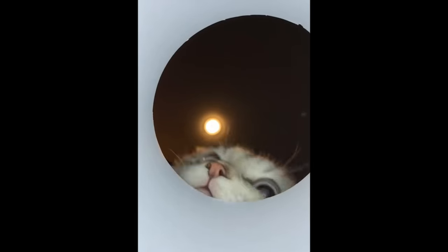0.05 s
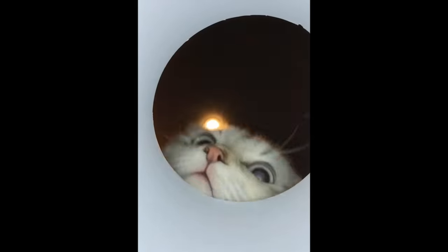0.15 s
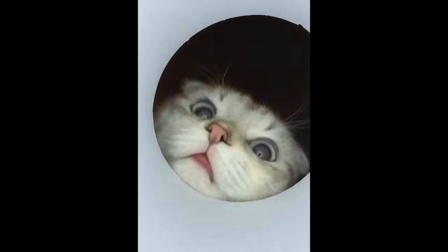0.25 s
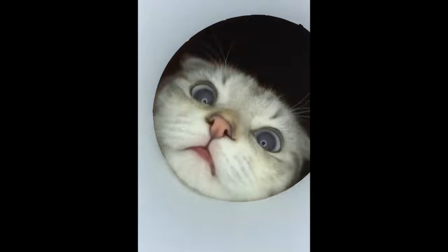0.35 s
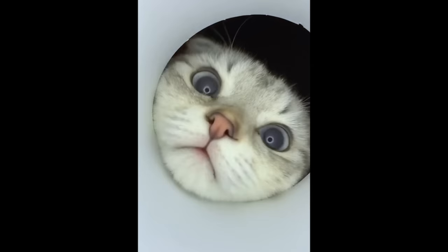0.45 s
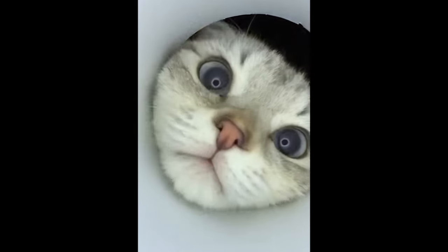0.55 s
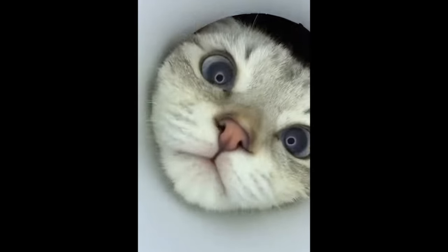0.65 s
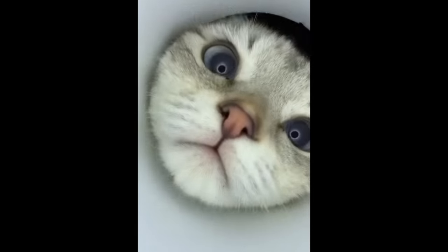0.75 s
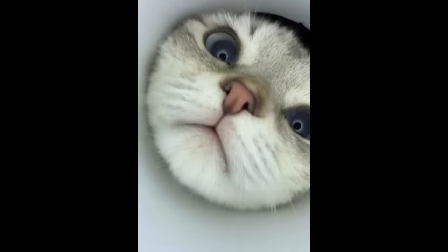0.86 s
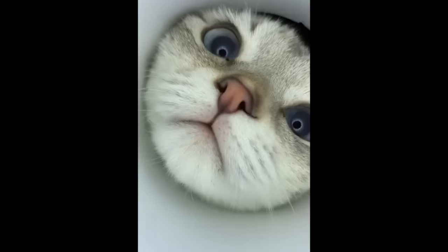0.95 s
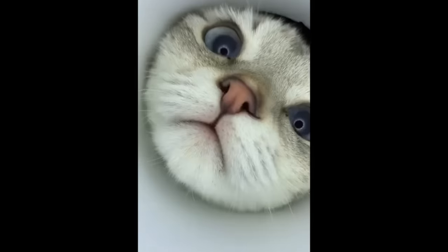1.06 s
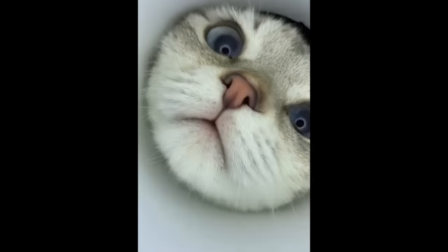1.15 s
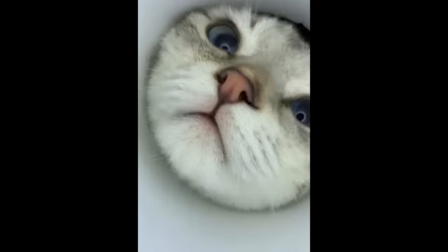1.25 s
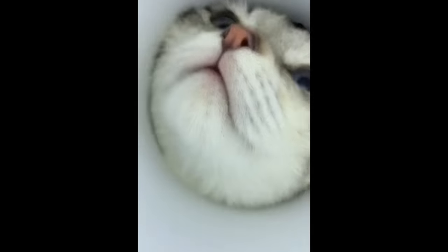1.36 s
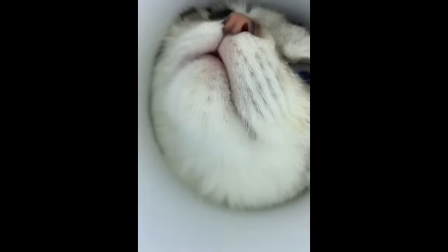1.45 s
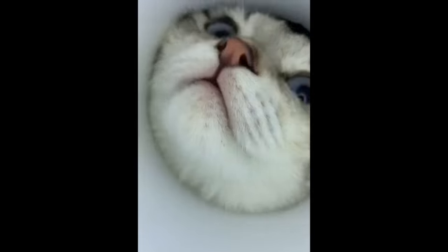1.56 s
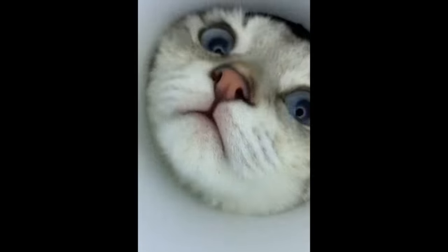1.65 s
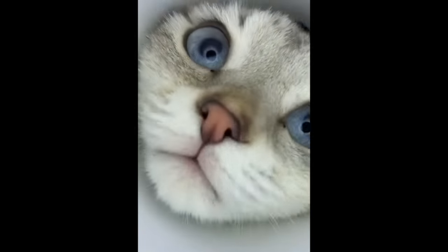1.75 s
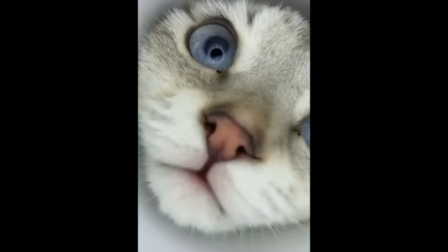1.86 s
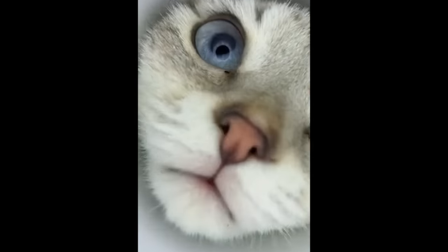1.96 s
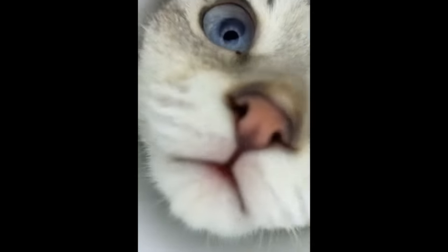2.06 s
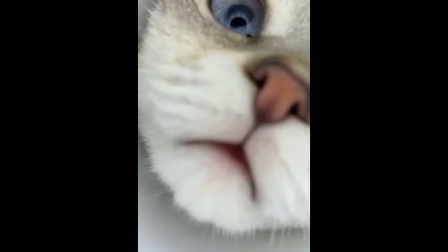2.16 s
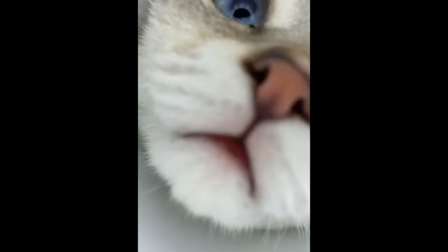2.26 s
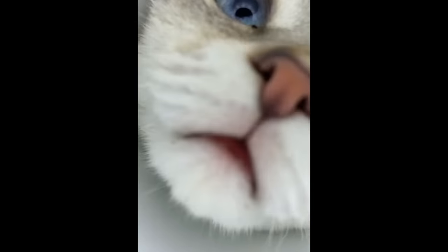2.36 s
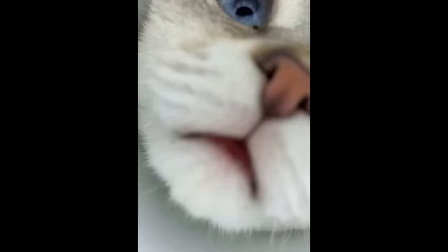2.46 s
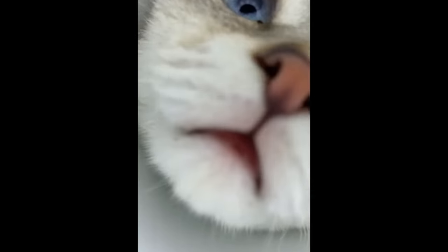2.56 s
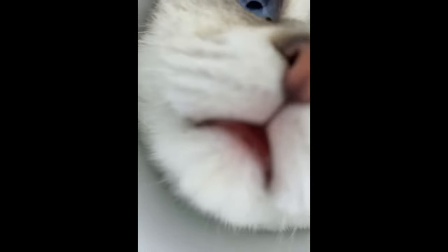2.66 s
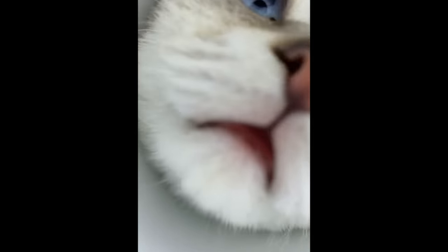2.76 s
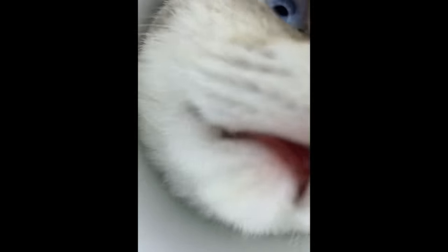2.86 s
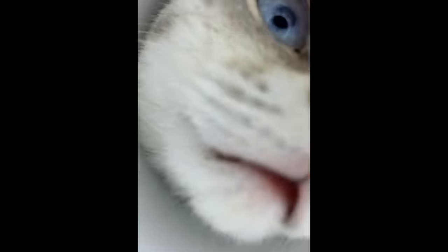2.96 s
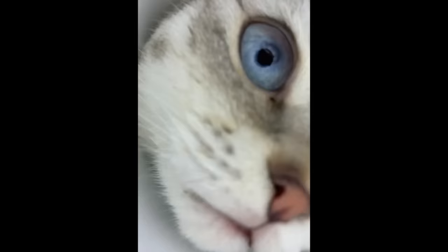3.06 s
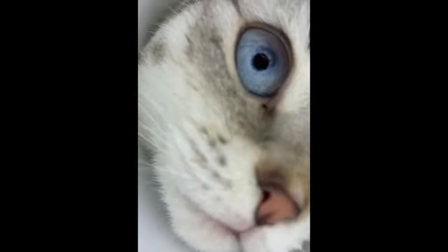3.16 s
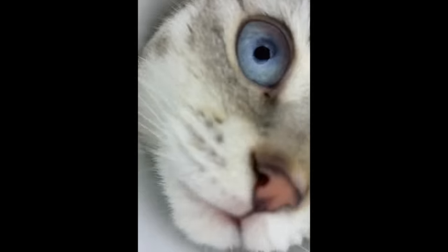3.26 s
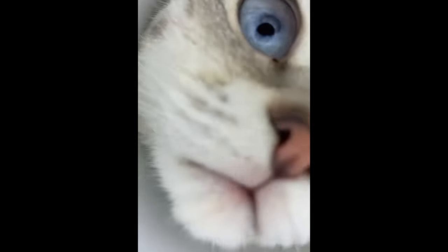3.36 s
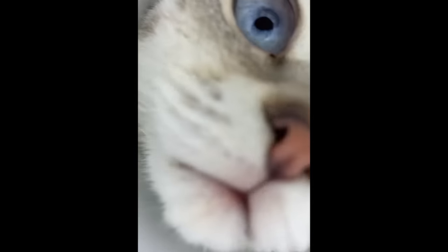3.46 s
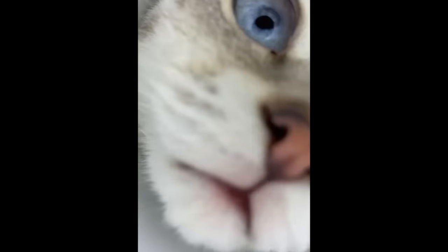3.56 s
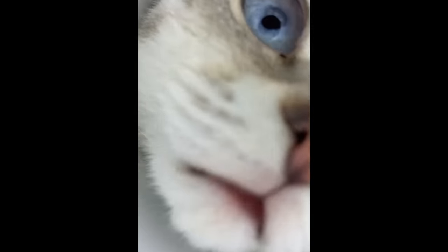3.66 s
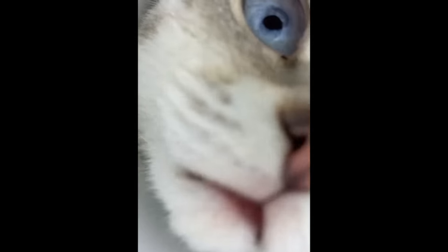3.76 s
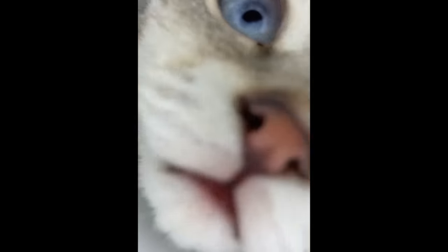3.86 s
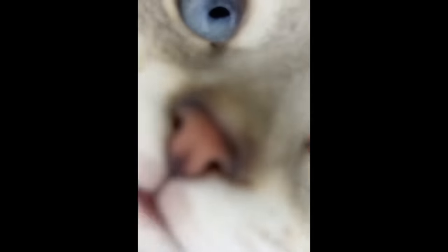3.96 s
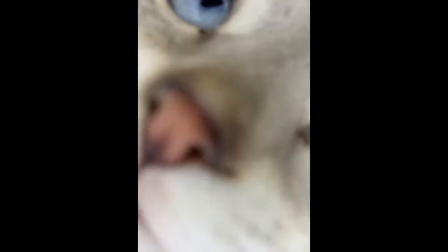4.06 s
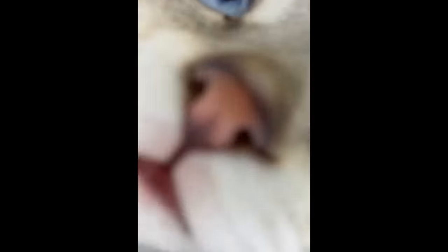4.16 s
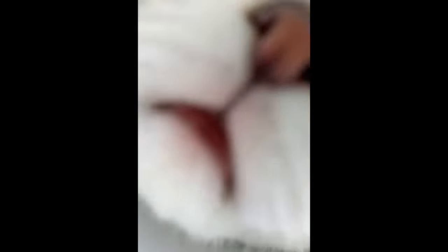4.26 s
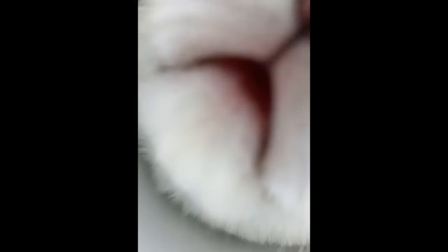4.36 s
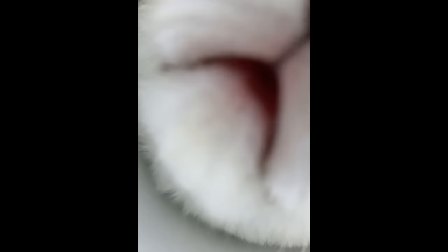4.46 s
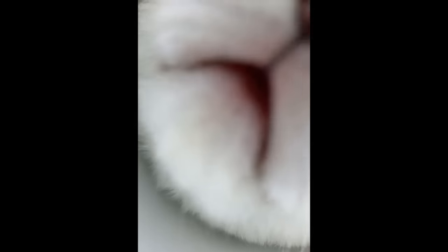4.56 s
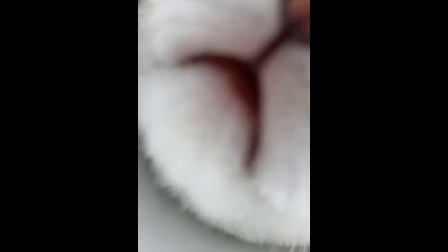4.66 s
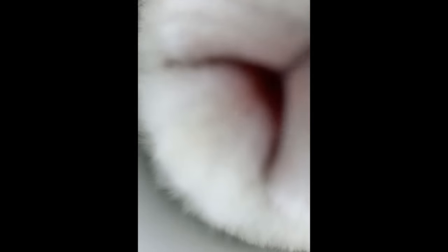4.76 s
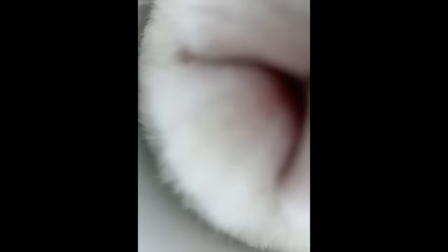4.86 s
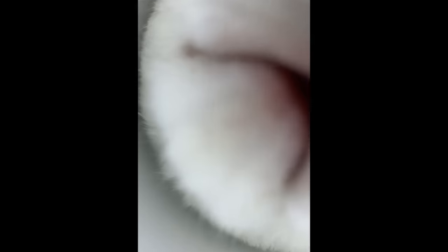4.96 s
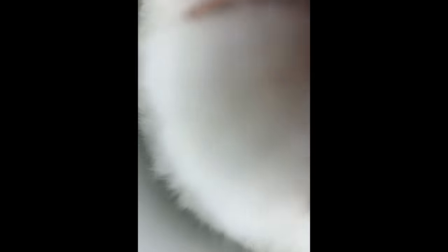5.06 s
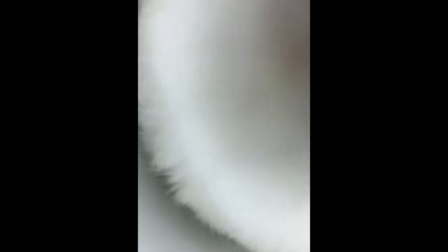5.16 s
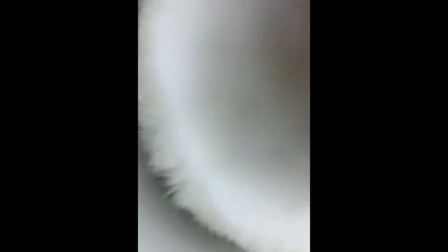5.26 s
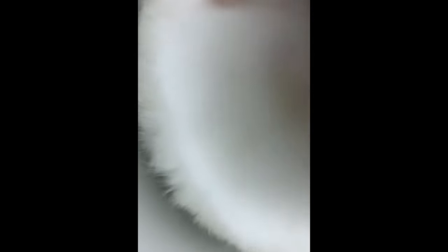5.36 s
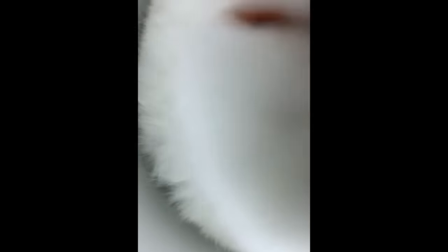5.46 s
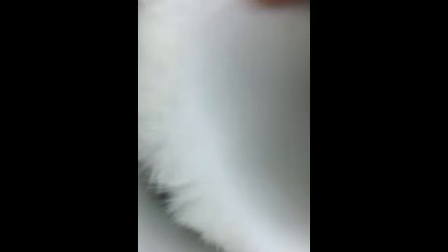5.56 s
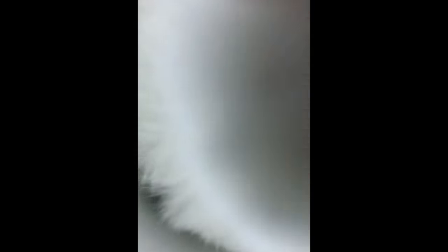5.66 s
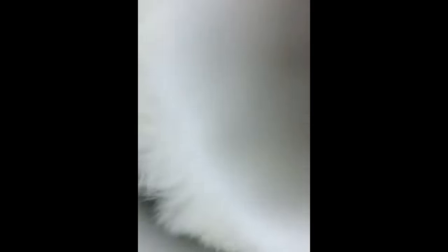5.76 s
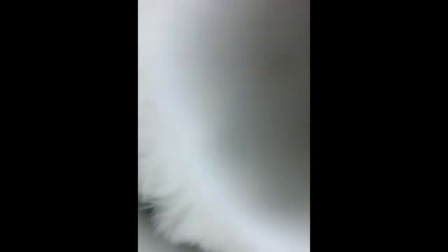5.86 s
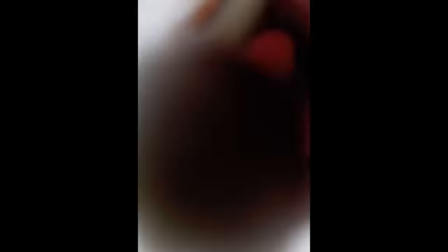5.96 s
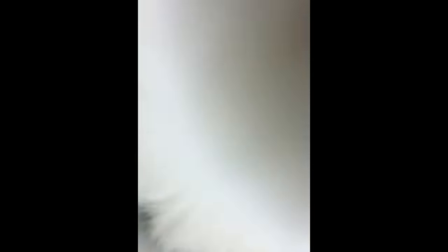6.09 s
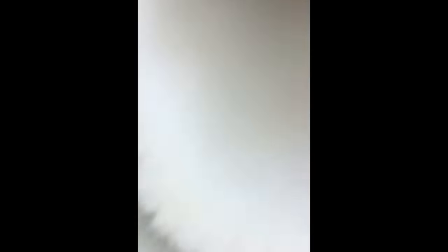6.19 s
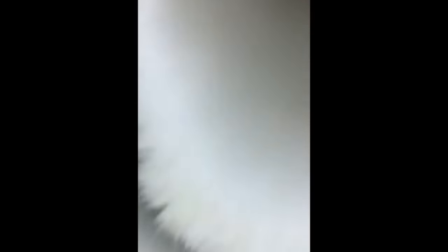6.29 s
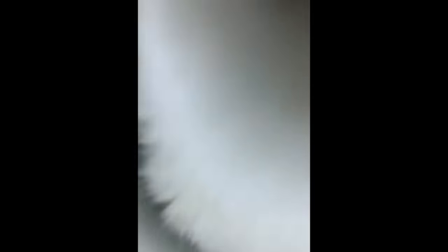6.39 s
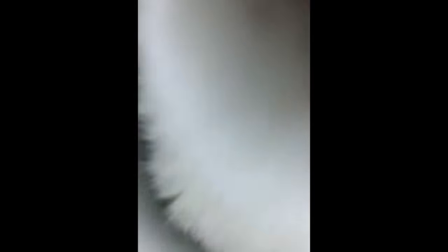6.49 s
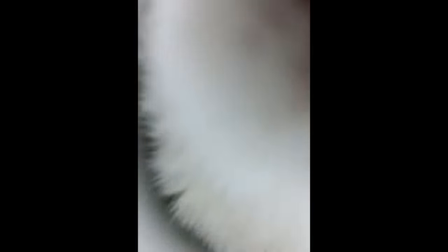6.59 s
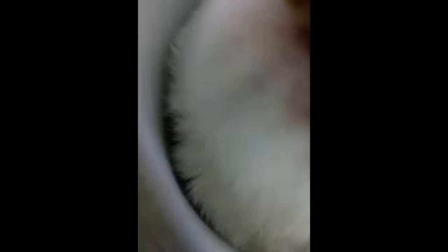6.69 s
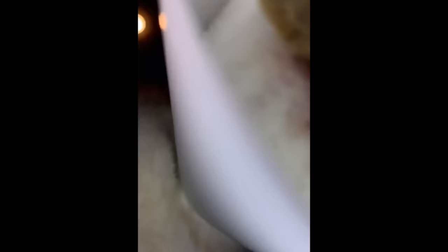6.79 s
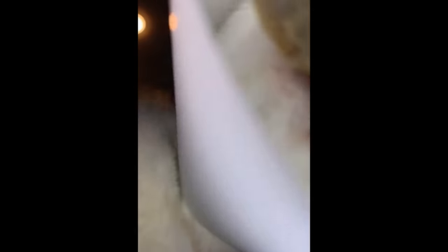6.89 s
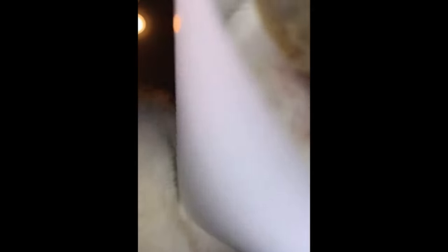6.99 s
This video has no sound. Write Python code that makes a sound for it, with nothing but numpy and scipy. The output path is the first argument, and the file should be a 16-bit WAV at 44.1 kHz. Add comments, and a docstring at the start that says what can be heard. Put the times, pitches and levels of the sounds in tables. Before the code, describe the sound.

A cat nuzzles a phone, its soft close rustling and muffled bumps building into loud scraping and knocking on the microphone.

```python
"""A cat nuzzles a phone

Fur brushes over the case in countless tiny slips, and the muzzle nudges it with soft thumps.
From five seconds on the chin grinds across the microphone ports, with scrapes and hard knocks.
Everything arrives through the case, dry and close, each click treble first and bass last."""
import sys
import numpy as np
from scipy import signal
from scipy.fft import rfft, irfft
from scipy.io import wavfile
from scipy.ndimage import uniform_filter1d

SR = 44100
rng = np.random.default_rng(int(sys.argv[2]) if len(sys.argv) > 2 else 0)


def materialize(psi):
    """Save the field psi as 16-bit PCM at rate SR to the path in sys.argv[1].

    A 1-D psi becomes a single channel; in a 2-D psi each row is a channel.
    """
    bounded = np.clip(np.atleast_2d(psi).T, -1, 1)
    quanta = np.round(bounded * 32767).astype(np.int16)
    wavfile.write(sys.argv[1], SR, quanta)


N = 310057
HZ, TIME = np.fft.rfftfreq(N, 1 / SR), np.arange(N) / SR


def amp(db):
    return 10 ** (np.asarray(db) / 20)


def unit_rms(x):
    return x / np.sqrt(np.mean(x ** 2) + 1e-20)


def eq_db(curve, hz):
    """Read an EQ curve along a log frequency axis."""
    freq_hz, gain_db = np.transpose(curve)
    return np.interp(np.log(hz + 1), np.log(freq_hz + 1), gain_db)


def place(mix, start_s, sound):
    part = mix[:, max(round(start_s * SR), 0):][:, :sound.shape[-1]]
    part += sound[..., :part.shape[1]]


def wander(rate_hz):
    """Smooth random modulation of unit size."""
    return unit_rms(irfft(rfft(rng.standard_normal(N)) * np.exp(-(HZ / rate_hz) ** 2), N))


def swell(t, length_s, attack_s, release_s, arch_db=0):
    """Envelope of one movement: it sets in, is strongest midway and lets go."""
    arch = amp(-arch_db * np.clip(2 * t / length_s - 1, -1, 1) ** 2)
    return arch * (1 + np.tanh(t / attack_s)) * (1 + np.tanh((length_s - t) / release_s)) / 4


def dispersion(hz, lag_cycles=1.5):
    """Low notes lag by a fixed number of cycles, so each click becomes a quick falling chirp."""
    return np.exp(-2j * np.pi * lag_cycles * np.log(hz + 20))


def resonance(hz, centre_hz, lift_db, q):
    """A short ring that lifts the band around one pitch."""
    return 1 + (amp(lift_db) - 1) / (1 + 1j * q * (hz / centre_hz - centre_hz / (hz + 1)))


def pitched_noise(pitch_hz, width_hz, size):
    """Noise gathered around one pitch, or a pitch curve."""
    offset_hz = np.fft.fftfreq(size, 1 / SR)
    white = rng.standard_normal(size) + 1j * rng.standard_normal(size)
    band = np.fft.ifft(np.fft.fft(white) * np.exp(-(offset_hz / width_hz) ** 2))
    carrier = np.exp(2j * np.pi * np.cumsum(pitch_hz * np.ones(size)) / SR)
    return unit_rms((band * carrier).real)


def shifting_contact(x, patchy_db, size=512):
    """The contact point shifts, so the colour keeps changing in small patches."""
    frames = dict(nperseg=size, noverlap=size * 3 // 4)
    spectra = signal.stft(x, **frames)[2]
    patches = uniform_filter1d(rng.standard_normal(spectra.shape[1:]), size=5, axis=0)
    patches = uniform_filter1d(patches, size=16, axis=1)
    return signal.istft(spectra * amp(patchy_db * unit_rms(patches)), **frames)[1][:, :N]


def friction(eq, slips_per_s, spread_db, slide, flutter_db, flutter_hz, stereo, patchy_db):
    """Tiny slips of uneven size over a smooth slide, under a fluttering grip."""
    strength = amp(spread_db * np.minimum(rng.exponential(1, (3, N)), 3))
    slips = rng.choice([-1, 1], (3, N)) * strength * (rng.random((3, N)) < slips_per_s / SR)
    drive = unit_rms(slips) + slide * rng.standard_normal((3, N))
    drive *= amp(flutter_db * np.tanh(wander(flutter_hz)))
    ports = drive[0] + stereo * drive[1:]  # each port hears a few hairs of its own
    coloured = irfft(rfft(ports) * amp(eq_db(eq, HZ)) * dispersion(HZ), N)
    return unit_rms(shifting_contact(coloured, patchy_db))


# Bass-heavy colour of the room: freq_hz, gain_db
ROOM_EQ = [(20, 4), (55, 35.5), (150, 20), (450, -8), (1000, -25), (3000, -44), (6000, -57), (13000, -36)]


def room_tone(level_db=-58.5, stereo=0.24):
    """Faint steady noise of a quiet room."""
    noise = rng.standard_normal((3, N))
    ports = noise[0] + stereo * noise[1:]
    return amp(level_db) * unit_rms(irfft(rfft(ports) * amp(eq_db(ROOM_EQ, HZ)), N))


# Glide of a faint hum on the first strokes: time_s, pitch_hz, level_db
HUM_GLIDE = [(0, 661, -74), (.1, 655, -61), (.2, 660, -56), (.3, 632, -62), (.55, 604, -73), (.7, 598, -67),
             (.9, 600, -100)]


def airy_hum(width_hz=45):
    """A narrow, airy resonance that sinks and fades as the face closes in."""
    time_s, pitch_hz, level_db = np.transpose(HUM_GLIDE)
    tone = pitched_noise(np.interp(TIME, time_s, pitch_hz), width_hz, N)
    return amp(np.interp(TIME, time_s, level_db)) * tone


# The coat rasps as the muzzle presses harder: start_s, length_s, level_db, pitch_hz, width_hz
COAT_PRESSES = [(0.16, 0.2, -60, 1620, 260), (0.75, 0.11, -56, 1560, 240), (1.27, 0.1, -60, 1520, 300),
                (3.78, 0.09, -55, 650, 220), (4.12, 0.16, -58, 1100, 700), (4.13, 0.15, -57, 2900, 700),
                (4.98, 0.11, -48, 2700, 900), (4.97, 0.13, -50, 620, 450)]
# A whisker squeaks over the case: start_s, length_s, level_db, pitch_hz
WHISKER_SQUEAKS = [(4.466, 0.012, -62, 5690), (4.488, 0.014, -63, 5680), (4.595, 0.02, -56, 9500)]


def hair_stick_slip(size=16384, lead_s=0.06, press_edge_s=0.025, squeak_edge_s=0.004, squeak_hz=190):
    """Hairs stick and slip around one pitch: broadly for the coat, squeak_hz wide for a whisker."""
    out, t = np.zeros((2, N)), np.arange(size) / SR - lead_s
    presses = [(*row, press_edge_s) for row in COAT_PRESSES]
    squeaks = [(*row, squeak_hz, squeak_edge_s) for row in WHISKER_SQUEAKS]
    for start_s, length_s, level_db, pitch_hz, width_hz, edge_s in presses + squeaks:
        envelope = amp(level_db) * swell(t, length_s, edge_s, edge_s)
        place(out, start_s - lead_s, envelope * pitched_noise(pitch_hz, width_hz, size))
    return out


# Colours of the muffled rub, coat swish, hair tips and shaking phone: freq_hz, gain_db
RUB_EQ = [(20, -21), (45, 10), (90, -2), (150, 3), (280, -3.5), (440, 1.5), (700, -12.5), (1400, -17.5),
          (2200, -22.5), (4000, -63), (13000, -27)]
SWISH_EQ = [(200, -23), (650, -3.5), (1200, -5), (2000, -6), (2900, 8), (3500, 9), (4500, -8.5),
            (5600, 4.5), (6500, -10), (8000, 3.5), (13000, -31)]
HAIR_TIP_EQ = [(2000, -99), (5000, -9.5), (6500, 11), (8500, 7), (9700, 7.5), (10700, 4), (12000, 3),
               (13000, -8)]
RUMBLE_EQ = [(15, -24.5), (30, -15), (55, 2), (100, -2), (170, -2), (300, -22), (800, -72), (3000, -82)]
# Hollows of the case that the swish rings: pitch_hz, width_hz, lift_db
CASE_HOLLOWS = [(890, 49, 4), (1552, 460, 12.5), (4477, 610, 20.5)]
# Cheek strokes, pressure being rub over brushing: start_s, length_s, brush_db, pressure_db
CHEEK_STROKES = [(0.04, 0.077, -50.5, -26), (0.145, 0.15, -43.5, -25), (0.296, 0.39, -47, -11.5),
                 (0.719, 0.13, -45.5, -4), (0.856, 0.11, -69.5, 11), (1.039, 0.036, -62.5, 9),
                 (1.249, 0.12, -46, -9), (1.404, 0.063, -69.5, -4), (1.497, 0.11, -57.5, 4),
                 (1.635, 0.37, -53.5, -2), (2.007, 0.16, -49.5, -1), (2.179, 0.22, -68.5, 8.5),
                 (2.51, 0.11, -67, 11), (2.721, 0.083, -60, 7.5), (2.809, 0.067, -61.5, 11),
                 (2.916, 0.12, -54.5, 6), (3.067, 0.095, -60, 7), (3.194, 0.21, -59.5, 1.5),
                 (3.474, 0.023, -62.5, 8.5), (3.578, 0.1, -60.5, 1.5), (3.762, 0.26, -59.5, 7),
                 (4.086, 0.19, -52.5, 6), (4.285, 0.15, -68, 15.5), (4.468, 0.025, -74, 21),
                 (4.552, 0.36, -59, 12), (4.913, 0.22, -53.5, 2)]


def cheek_strokes(flatten=0.098):
    """The cheek slides along the case: a muffled rub, a swish of coat and a fine hiss of hair tips."""
    rub_gain, swish_gain, tips_gain = amp([-66, -78, -78])  # resting contact
    for start_s, length_s, brush_db, pressure_db in CHEEK_STROKES:
        envelope = swell(TIME - start_s, length_s, attack_s=0.029, release_s=0.026, arch_db=1.5)
        gain = amp(brush_db) * envelope
        rub_gain += gain * amp(pressure_db)
        # pressure flattens the hair tips, trading hiss for swish
        swish_gain += gain * amp(flatten * pressure_db)
        tips_gain += gain * amp(-flatten * pressure_db)
    rub = friction(RUB_EQ, slips_per_s=900, spread_db=1, slide=0.53,
                   flutter_db=3.5, flutter_hz=40, stereo=0.64, patchy_db=3)
    swish = friction(SWISH_EQ, slips_per_s=4000, spread_db=1.5, slide=0.57,
                     flutter_db=0.5, flutter_hz=70, stereo=0.0053, patchy_db=3)
    tips = friction(HAIR_TIP_EQ, slips_per_s=4600, spread_db=5.5, slide=1,
                    flutter_db=2, flutter_hz=75, stereo=0.92, patchy_db=2)
    rumble = friction(RUMBLE_EQ, slips_per_s=470, spread_db=0.5, slide=1,
                      flutter_db=8.5, flutter_hz=42, stereo=0.14, patchy_db=3)
    hollows_db = sum(db / (1 + (2 * (HZ - hz) / width) ** 2) for hz, width, db in CASE_HOLLOWS)
    ringing = unit_rms(irfft(rfft(swish) * amp(hollows_db), N))
    coat = ringing + amp(-10.5) * rumble  # a stroke also shakes the phone
    return amp(3) * rub_gain * rub + amp(2) * swish_gain * coat + amp(1.5) * tips_gain * tips


# Soft thumps of the muzzle; the row at 3.209 s is the slow low tail of the knock at 3.19 s: centre_s, level_db,
# pitch_hz, half_length_s
MUZZLE_NUDGES = [(0.33, -43.5, 58.4, 0.027), (1.059, -34, 144, 0.012), (1.568, -34, 141, 0.015),
                 (1.65, -41.5, 55, 0.02), (1.899, -38.5, 52, 0.014), (2.05, -33.5, 150, 0.016),
                 (2.232, -36.5, 139, 0.015), (2.329, -40, 49.3, 0.018), (2.553, -42.5, 54.6, 0.015),
                 (2.72, -29.5, 63.4, 0.013), (2.849, -35, 138, 0.02), (2.963, -32, 126, 0.016),
                 (3.012, -37, 121, 0.015), (3.034, -37, 55, 0.017), (3.209, -32.5, 154, 0.017),
                 (3.442, -45.5, 54.5, 0.014), (3.565, -39, 50.6, 0.017), (3.964, -35.5, 161, 0.015),
                 (4.418, -39, 52, 0.013), (4.669, -37.5, 49.2, 0.017), (4.832, -29.5, 159, 0.014),
                 (4.893, -42, 59.6, 0.028), (5.143, -23.5, 110, 0.011), (5.168, -15, 55, 0.013),
                 (5.994, -19.5, 75.5, 0.024), (6.102, -28, 62.7, 0.024), (6.154, -19.5, 55.7, 0.024),
                 (6.544, -30.5, 350, 0.014), (6.606, -22.5, 193, 0.012), (6.624, -18, 165, 0.014)]


def muzzle_nudges(sag_s=0.0447, rough=0.28, rebound_s=0.053, rebound_db=-48.5, rebound_hz=50.6):
    """A push rocks the phone at a falling pitch, then it rocks back; squashed fur roughens the thud."""
    out, t = np.zeros((2, N)), np.arange(-SR // 20, SR // 20) / SR
    hz = np.fft.rfftfreq(len(t), 1 / SR)
    rebounds = [(s + rebound_s, rebound_db, rebound_hz, half_s) for s, _, _, half_s in MUZZLE_NUDGES]
    for centre_s, level_db, pitch_hz, half_length_s in MUZZLE_NUDGES + rebounds:
        cycles = pitch_hz * sag_s * (1 - np.exp(-t / sag_s)) + rng.random()
        band = hz / pitch_hz / (1 + (hz / (2.12 * pitch_hz)) ** 4)
        squash = unit_rms(irfft(rfft(rng.standard_normal(len(t))) * band, len(t)))
        envelope = amp(level_db) * np.exp(-(t / half_length_s) ** 2)
        place(out, centre_s + t[0], envelope * (np.sin(2 * np.pi * cycles) + rough * squash))
    return out


# Colours of fur tearing free and of fur hissing on the ports: freq_hz, gain_db
TEAR_EQ = [(60, -17), (200, -2), (450, 9.5), (800, 3), (1400, -3), (2000, -4), (3000, -6.5), (5000, -46),
           (13000, -34)]
HISS_EQ = [(800, -75), (2500, -0.5), (4200, -1.5), (6000, -4.5), (8000, -6.5), (10500, -10), (12500, -7),
           (13500, -29)]
# Snags on a port's edge: start_s, length_s, rasp_db, hiss_db, pocket_low_hz, pocket_high_hz
FUR_SCRAPES = [(5.471, 0.018, -31, -32.5, 810, 1530), (5.515, 0.04, -37.5, -39, 600, 2300),
               (5.571, 0.015, -29.5, -43, 705, 1610), (5.606, 0.028, -34, -47, 880, 2100),
               (5.969, 0.024, -35, -47, 696, 1560), (6.084, 0.016, -30.5, -54, 900, 1810),
               (6.129, 0.027, -24.5, -37.5, 1490, 3150), (6.321, 0.011, -23, -33, 710, 2750),
               (6.334, 0.026, -31.5, -40.5, 990, 1560), (6.673, 0.013, -28, -30, 700, 2550),
               (6.689, 0.014, -27.5, -28, 440, 980)]


def fur_scrapes(edge_s=0.0018, size=4096, lead_s=0.02):
    """Fur catches and tears free in bursts of hard slips, coloured by the pocket of air under it."""
    rasp = friction(TEAR_EQ, slips_per_s=800, spread_db=0.5, slide=0.16,
                    flutter_db=5.5, flutter_hz=250, stereo=0.73, patchy_db=1.5)
    hiss = friction(HISS_EQ, slips_per_s=2900, spread_db=8, slide=0.42,
                    flutter_db=3.5, flutter_hz=247, stereo=0.4, patchy_db=2)
    out, hz, t = np.zeros((2, N)), np.fft.rfftfreq(size, 1 / SR), np.arange(size) / SR - lead_s
    for start_s, length_s, rasp_db, hiss_db, low_hz, high_hz in FUR_SCRAPES:
        span = round(start_s * SR) + np.arange(size)
        gate = np.clip(np.minimum(t, length_s - t) / edge_s + 0.5, 0, 1)
        pocket = resonance(hz, low_hz, lift_db=9, q=5) * resonance(hz, high_hz, lift_db=10, q=5)
        hollow_rasp = unit_rms(irfft(rfft(rasp[:, span]) * pocket))
        scrape = amp(rasp_db) * hollow_rasp + amp(hiss_db) * unit_rms(hiss[:, span])
        place(out, start_s - lead_s, gate * scrape)
    return out


# Colour of the chin's coarse rasp: freq_hz, gain_db
RASP_EQ = [(60, -17), (200, 5.5), (450, 4), (800, -0.5), (1400, -2), (2000, -6.5), (3000, -4.5),
           (5000, -57), (13000, -55)]
# Drags over the ports; fur sets the hiss and weight the rumble, both riding on the rasp level:
# start_s, length_s, rasp_db, fur_db, weight_db, pocket_hz
CHIN_DRAGS = [(5.325, 0.085, -39, -13.5, 9, 960), (5.456, 0.099, -34.5, -26, 1, 1100),
              (5.57, 0.088, -46, -18, -1, 2030), (5.648, 0.09, -64, -34, 23, 400),
              (5.785, 0.21, -42, -12, 3, 700), (5.972, 0.041, -41, -3.5, 2, 664),
              (6.072, 0.086, -40, -5, 9, 1490), (6.172, 0.093, -46, -18, 12.5, 1200),
              (6.308, 0.053, -39.5, -27, 12, 700), (6.42, 0.044, -40.5, -29, -3, 1270),
              (6.537, 0.18, -37.5, -4.5, 2, 453), (6.706, 0.069, -45.5, -6, 8.5, 816),
              (6.82, 0.083, -56.5, -2, 3, 1000), (6.959, 0.052, -42.5, -8.5, 2, 840)]


def chin_grind(landing_s=0.057):
    """The chin lands on the ports, stays there and drags: rumble, coarse stick-slip rasp and hiss."""
    touching = np.clip((TIME - CHIN_DRAGS[0][0]) / landing_s + 1, 0, 1)
    rumble_gain, rasp_gain, hiss_gain = (touching * amp(rest_db) for rest_db in (-52, -61, -63))
    for start_s, length_s, rasp_db, fur_db, weight_db, _ in CHIN_DRAGS:
        gain = amp(rasp_db) * swell(TIME - start_s, length_s, attack_s=0.021, release_s=0.02, arch_db=1)
        rumble_gain += gain * amp(weight_db)
        rasp_gain += gain
        hiss_gain += gain * amp(fur_db)
    rumble = friction(RUMBLE_EQ, slips_per_s=440, spread_db=0.5, slide=1,
                      flutter_db=4, flutter_hz=22.7, stereo=0.25, patchy_db=-4.5)
    rasp = friction(RASP_EQ, slips_per_s=280, spread_db=3, slide=0.34,
                    flutter_db=3, flutter_hz=96, stereo=0.78, patchy_db=3.5)
    hiss = friction(HISS_EQ, slips_per_s=1100, spread_db=4.5, slide=1,
                    flutter_db=1.5, flutter_hz=100, stereo=0.13, patchy_db=3)
    rasp = chin_pocket(rasp)
    return amp(-2) * rumble_gain * rumble + amp(2) * rasp_gain * rasp + amp(3) * hiss_gain * hiss


def chin_pocket(rasp, ring_db=4, q=8.5, drift=0.18, drift_hz=25):
    """The pocket of air under the chin resonates, and its pitch moves from drag to drag."""
    start_s, length_s, _, _, _, pocket_hz = np.transpose(CHIN_DRAGS)
    pitch_hz = np.interp(TIME, start_s + length_s / 2, pocket_hz) * np.exp(drift * wander(drift_hz))
    carrier = np.exp(2j * np.pi * np.cumsum(pitch_hz) / SR)
    pole = np.exp(-np.pi * np.mean(pocket_hz) / q / SR)
    # shift down, low-pass, shift back: a band-pass that follows the pitch
    ringing = 2 * (carrier * signal.lfilter([1 - pole], [1, -pole], rasp / carrier)).real
    return unit_rms(rasp + amp(ring_db) * ringing)


def chin_chatter(max_per_drag=8, per_s=22, over_rasp_db=20, spread_db=4, dull_hz=1990, sharp_hz=9000,
                 weight_db=8, ring_db=11, case_db=2, lag_cycles=1.2):
    """Rows of light knocks that ring the pocket at random moments, stronger in a harder drag."""
    rows = []
    for start_s, length_s, rasp_db, _, _, pocket_hz in CHIN_DRAGS:
        for k, (when, force, sharpness) in enumerate(rng.random((max_per_drag, 3))):
            delay_s = (k + when) / per_s
            level_db = rasp_db + over_rasp_db + spread_db * (2 * force - 1)
            top_hz = dull_hz * (sharp_hz / dull_hz) ** sharpness
            if delay_s < length_s:
                rows.append((start_s + delay_s, level_db, weight_db, top_hz,
                             pocket_hz, ring_db, case_db, lag_cycles))
    return rows


# Colour of a blow: freq_hz, gain_db
BLOW_EQ = [(110, -1.5), (400, -1), (1500, -12), (7500, -9.5)]
# Short-lived modes of the case, rung by every blow: pitch_hz, width_hz, gain_db
CASE_MODES = [(545, 170, -18.5), (1394, 63, -1), (2300, 210, -5), (7500, 470, -7.5)]
# Hard contacts; weight adds bass, top sets the sharpness, ring is the struck spot:
# start_s, level_db, weight_db, top_hz, ring_hz, ring_db, case_db, lag_cycles
HARD_KNOCKS = [(1.4257, -21, 20, 1200, 454, 11.5, -6, 2), (1.5001, -14, 15, 7190, 1570, 9, -2, 1.65),
               (1.547, -9.5, 13, 700, 425, 9, -6, 1.96), (2.033, -11.5, 27.5, 600, 297, 4.5, -9, 2.47),
               (2.3748, -13.5, 8, 9390, 4030, 15.5, 6, 1.6), (3.098, -12, 6, 14100, 2200, 1, 0, 1.04),
               (3.1105, -13, 12, 8200, 2300, 6, 11.5, 1.56), (3.121, -8, 11, 10700, 397, 5, 21, 1.22),
               (3.1908, -4.5, 13, 8200, 344, 10, -3, 2.2), (3.949, -11.5, 18, 800, 330, 9.5, -6, 2.2),
               (4.3316, -11, 8, 9400, 500, 10, 2, 1.5), (4.7846, -7.5, 11, 10700, 2020, 10, 5, 1.44),
               (4.8215, 5, 10, 11800, 517, 5, 9, 2.2), (5.1373, -2.5, 3.5, 3500, 870, 15, 6, 1.8),
               (5.1509, 14.5, 25, 3900, 2700, 8, 2, 1.9), (5.1633, -0.5, 4, 3000, 1000, 8, 8, 1.42),
               (5.1809, -5, 15, 12300, 9000, 3, -1, 1.75), (5.3465, -1, 11.5, 4780, 1030, 16.5, 4, 1.3),
               (5.385, 0.5, 12.5, 3000, 900, -2, 10, 1.84), (5.4, -4, 9, 2500, 700, -2, 0, 1.8),
               (5.4558, 13, 17.5, 6160, 5200, 8, 6, 1.45), (5.4716, 14.5, 12, 7200, 1410, 2, -4, 1.5),
               (5.482, 1, 2, 9390, 1070, 7, 0, 1.4), (5.4962, 11, 12.5, 12250, 3770, 8.5, 0, 1.34),
               (5.507, 22, 17.5, 1700, 980, 5, -4, 1.96), (5.5266, 5.5, 14, 14000, 3710, 1, 0, 1.7),
               (5.5326, 6, 8, 8200, 550, 13.5, 0, 1.8), (5.5437, 1.5, 5, 6290, 1900, 16, 0, 1.8),
               (5.5706, 13, 11, 7200, 6200, 7, 6, 1.44), (5.576, 2, 11, 8000, 900, 10, 0, 1.224),
               (5.5823, 1, 5, 8000, 2000, 11, 0, 1.2), (5.609, 11.5, 7, 9100, 1600, 13, -5, 1),
               (5.6222, 11.5, 5, 8150, 1880, 6, 5, 1.18), (5.629, 19.5, 1, 1590, 1290, -1, -7, 1.65),
               (5.6364, -2.5, 17, 3230, 646, 14.5, -5, 1.6), (5.786, -3, 12, 2600, 690, 17, 0, 1.2),
               (5.7998, -13, 27, 3500, 734, 20, 0, 1.35), (5.8663, 18.5, -8, 1930, 990, 4.5, -16, 1.1),
               (5.874, 6, 0, 1660, 1000, 9, 2, 1.3), (5.884, 16, -10, 1400, 900, 4, 0, 0.89),
               (5.9775, -1.5, 20, 4530, 630, 15, -3, 1.19), (5.989, -3, 12, 3500, 594, 16, 8, 0.99),
               (6.035, 0, 27, 694, 420, 1, -6, 1.3), (6.086, 6, -6, 2100, 1700, 16, -9, 1.28),
               (6.092, 8, -12, 2560, 870, 18, -2, 0.98), (6.1332, 4, 12, 4780, 2100, 6, 0, 1.15),
               (6.1384, 6, 19.5, 4780, 1500, 12.5, 3, 1.26), (6.146, 3, 13, 4050, 1540, 13, 5, 1.1),
               (6.1748, 5.5, 8, 14200, 5000, 3.5, -9, 1.5), (6.2159, 3.5, -6, 7240, 3200, 9, 3, 1.6),
               (6.23, -5, -2, 12000, 3000, 9, -5, 1.2), (6.259, -12, 5, 10000, 5500, 8, 5, 2),
               (6.3133, 14, -10, 14000, 553, 13.5, 0, 0.98), (6.3215, 12.5, -13, 8200, 1430, 9.5, -5, 1.03),
               (6.326, 14, -2, 10800, 660, 14, -10, 1.11), (6.3404, 6.5, -5, 6000, 2100, 7, 7, 0.92),
               (6.3452, 13, -3, 4220, 800, 8, 3, 1), (6.3505, 2.5, 12.5, 7190, 2090, 14.5, 7, 1.08),
               (6.411, 1.5, -10, 5560, 1420, 7, 7, 1.5), (6.4178, 4.5, 9, 4170, 1350, 14.5, -2, 1.37),
               (6.4302, -1, 14, 6290, 1570, 8, -2, 1.5), (6.45, 22, -14.5, 1800, 910, 2.5, -1, 1),
               (6.5084, 2, 0, 3200, 447, 7, 4, 1.9), (6.5132, -4.5, 10, 7190, 550, 18.5, -3, 1.66),
               (6.5616, 11, 4, 4600, 3080, 8, 8, 1.02), (6.592, -1, 26, 800, 300, 7.5, -6, 1.37),
               (6.672, 6.5, 0, 6900, 850, 16.5, -7, 0.99), (6.6785, 1.5, 1, 10000, 447, 20, -3, 1.17),
               (6.6848, 3, -1, 14000, 430, 19, 0, 1.43), (6.696, 4, 7, 10700, 804, 14, 3, 1.13),
               (6.8556, 7, -12, 2100, 785, 6, 4, 1.08), (6.8668, -12.5, 13, 6000, 1700, 19, 2, 1.55)]


def hard_knocks(attack_s=0.00061, decay_s=0.0012, recatch_s=0.001105, split_hz=2900, weight_hz=370,
                low_cut_hz=42, high_cut_hz=9800, stereo=0.52, size=8192, lead_s=0.014):
    """Each blow is a clean push and a millisecond of crunch, ringing the case and the struck spot."""
    out, hz, t = np.zeros((2, N)), np.fft.rfftfreq(size, 1 / SR), np.arange(size) / SR - lead_s
    lows = 1 / np.sqrt(1 + (hz / split_hz) ** 6)  # crossover: push below, crunch above
    band = hz ** 2 / (hz ** 2 + low_cut_hz ** 2) / np.sqrt(1 + (hz / high_cut_hz) ** 4)
    push = lows * np.exp(-2j * np.pi * hz * lead_s)
    modes = sum(amp(db) / (1 + 2j * (hz - pitch) / width) for pitch, width, db in CASE_MODES)
    blows = HARD_KNOCKS + chin_chatter()
    for start_s, level_db, weight_db, top_hz, ring_hz, ring_db, case_db, lag_cycles in blows:
        grit = rng.standard_normal((3, size)) * np.exp(np.minimum(t / attack_s, -t / decay_s))
        crunch = rfft(unit_rms(grit[0] + stereo * grit[1:])) * np.sqrt((1 - lows ** 2) / size)
        bass_db = weight_db / (1 + (hz / weight_hz) ** 2)
        colour = amp(level_db + eq_db(BLOW_EQ, hz) + bass_db) * band / np.sqrt(1 + (hz / top_hz) ** 6)
        ringing = (1 + amp(case_db) * modes) * resonance(hz, ring_hz, ring_db, q=3)
        # the contact slips and catches again, which hollows each blow differently
        recatch = 0.5 * rng.choice([-1, 1])
        delay_s = recatch_s * rng.uniform(0.604, 1.434)
        comb = 1 + recatch * np.exp(-2j * np.pi * hz * delay_s) * hz / (hz + 500)
        blow = (push + crunch) * colour * ringing * comb * dispersion(hz, lag_cycles)
        place(out, start_s - lead_s, irfft(blow))
    return out


# Phase between the two ports: freq_hz, left_lead_rad
PORT_LEAD = [(0, 0), (60, -.45), (160, -.9), (350, -1), (700, -.65), (1200, 0), (2000, 1.3), (3500, 3),
             (4100, 3.3), (5000, 6.1), (5900, 6.4), (6600, 9), (7700, 9.9), (8400, 12.5), (9400, 12.7),
             (10100, 15.4), (11000, 16), (11700, 18.8), (13500, 18.9)]
# Balance between the two ports: freq_hz, left_minus_right_db
PORT_PAN = [(100, .3), (300, -.9), (650, -3.3), (1300, -1.7), (2500, -.4), (4000, 0)]


def microphone_ports(sound):
    """Each band reaches the two ports slightly apart in time and level."""
    pan = amp(eq_db(PORT_PAN, HZ) / 2)
    lag = np.exp(-1j * np.interp(HZ, *np.transpose(PORT_LEAD)))
    return irfft(rfft(sound) * np.array([pan, lag / pan]), N)


def scene():
    """Brushing, grinding, thumps and knocks over room tone, all heard through the two ports."""
    # the pocket between chin and case keeps changing shape
    grinding = shifting_contact(chin_grind() + fur_scrapes(), patchy_db=3, size=1024)
    brushing = cheek_strokes() + hair_stick_slip() + airy_hum()
    mix = brushing + amp(0.5) * grinding + amp(-1) * muzzle_nudges() + room_tone() + hard_knocks()
    return microphone_ports(mix)


def record(dry, ceiling=0.52, cliff_hz=13100, cutoff_hz=15900):
    """The hardest blows saturate; the treble drops off a cliff, then cuts out altogether."""
    saturated = dry / (1 + (dry / ceiling) ** 4) ** (1 / 4)
    shelf_db = np.interp(HZ, [cliff_hz, cliff_hz + 600, cutoff_hz], [0, -28, -42])
    band_limit = np.clip((cutoff_hz - HZ) / 200, 0, 1)
    return irfft(rfft(saturated) * amp(shelf_db) * band_limit, N)


dry = scene()
out = record(dry)
materialize(out)
```